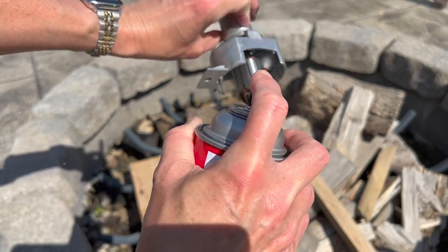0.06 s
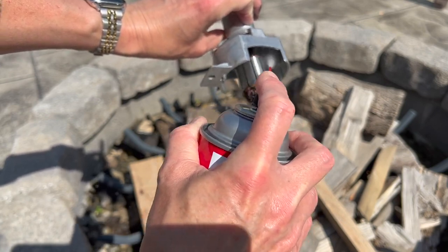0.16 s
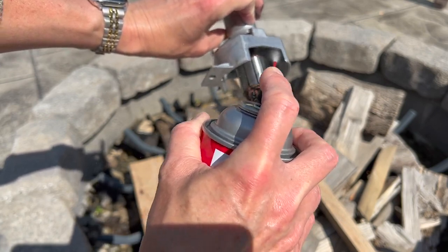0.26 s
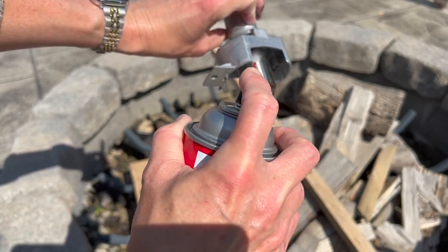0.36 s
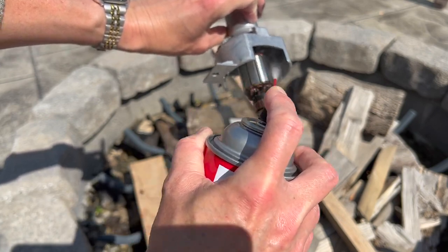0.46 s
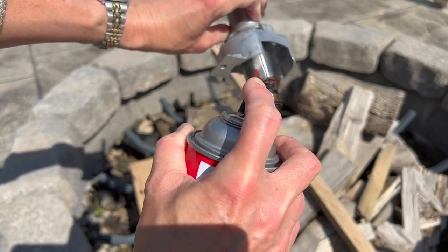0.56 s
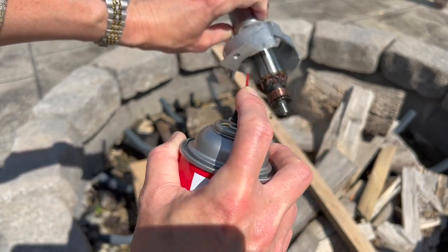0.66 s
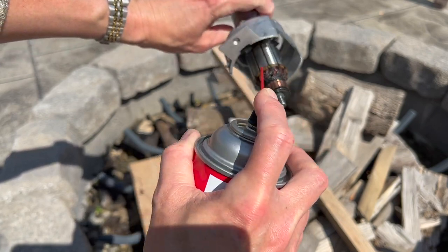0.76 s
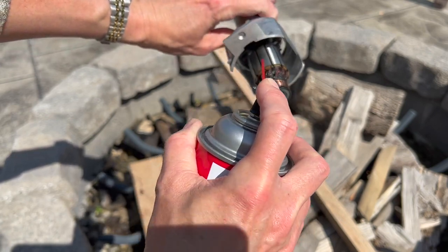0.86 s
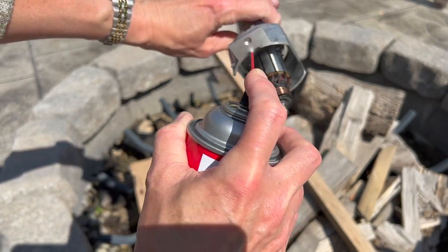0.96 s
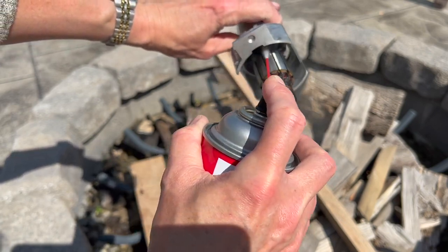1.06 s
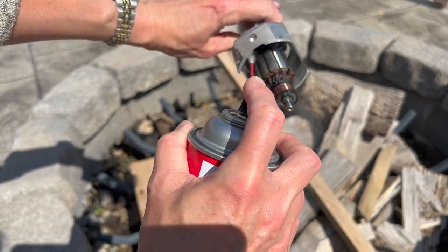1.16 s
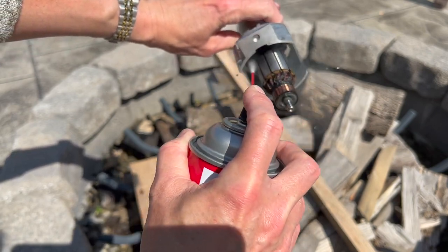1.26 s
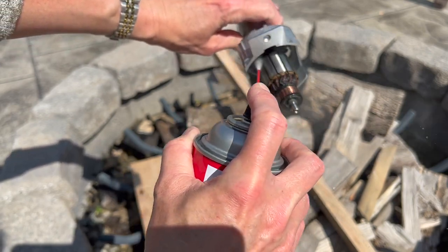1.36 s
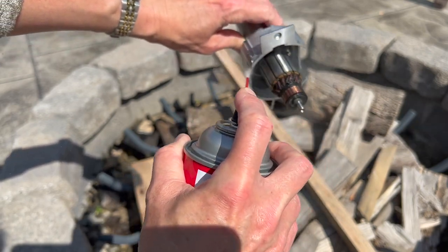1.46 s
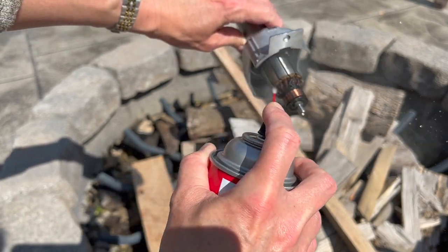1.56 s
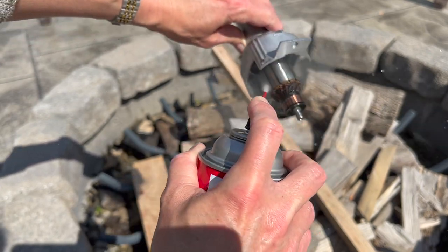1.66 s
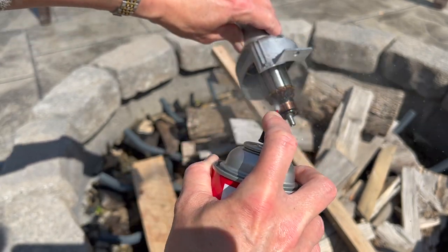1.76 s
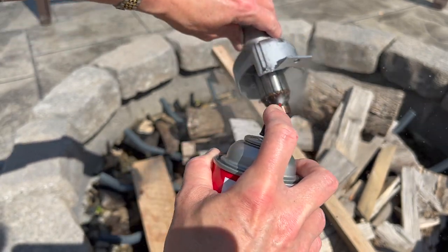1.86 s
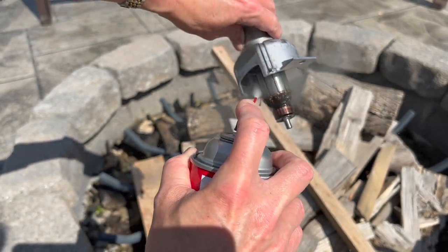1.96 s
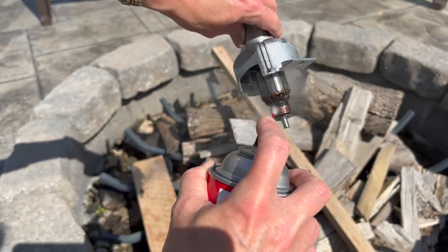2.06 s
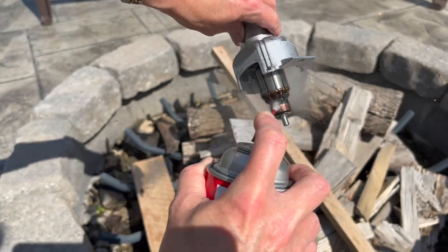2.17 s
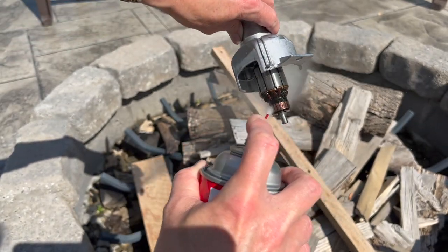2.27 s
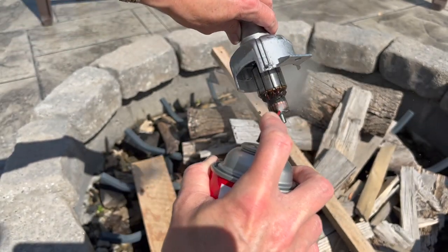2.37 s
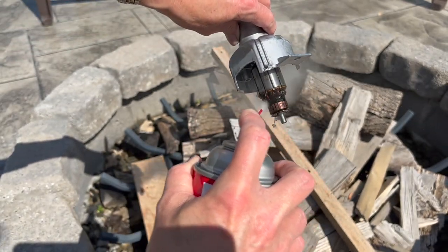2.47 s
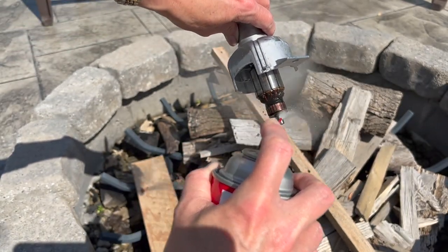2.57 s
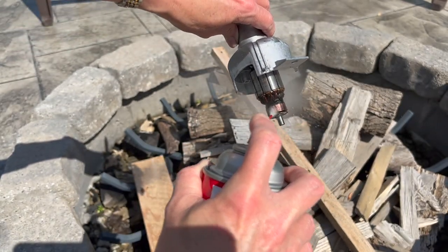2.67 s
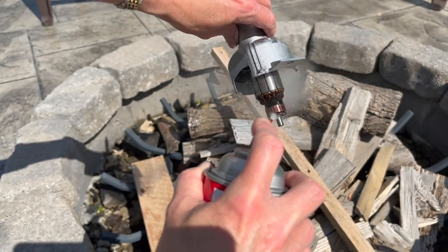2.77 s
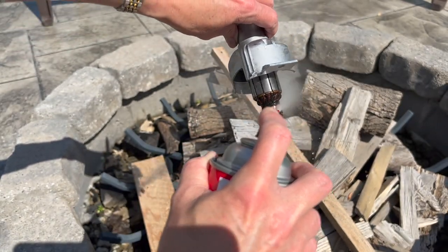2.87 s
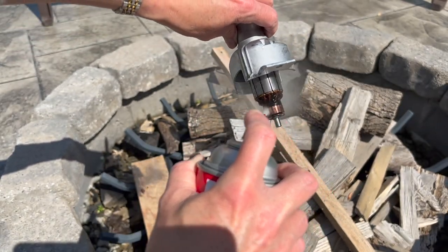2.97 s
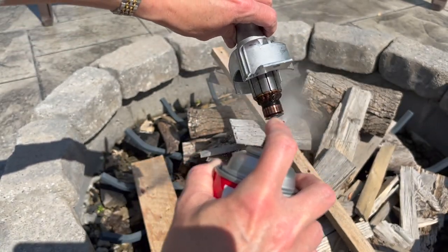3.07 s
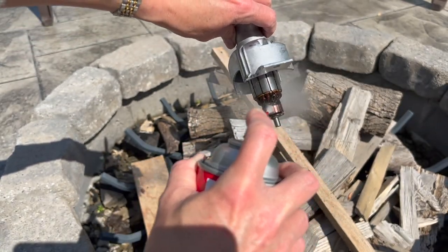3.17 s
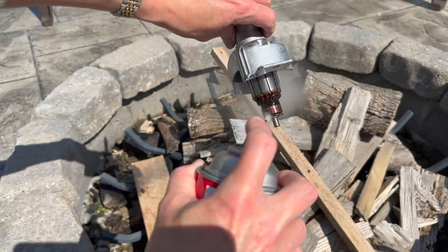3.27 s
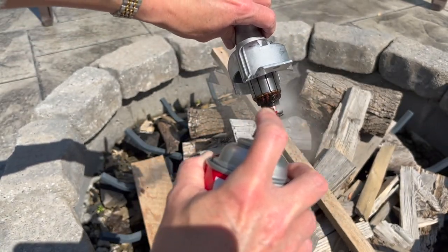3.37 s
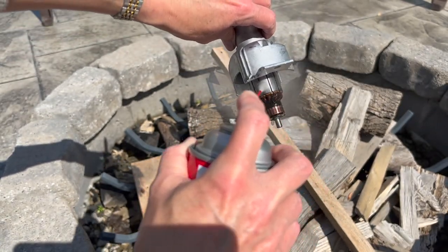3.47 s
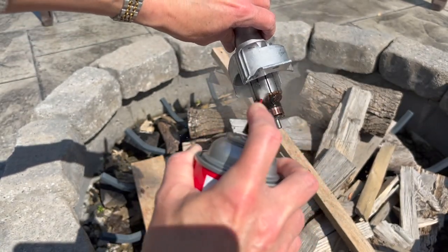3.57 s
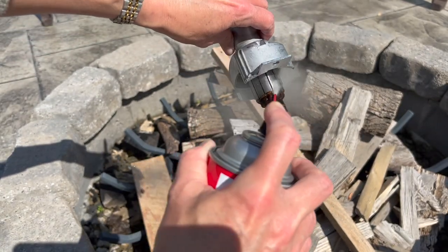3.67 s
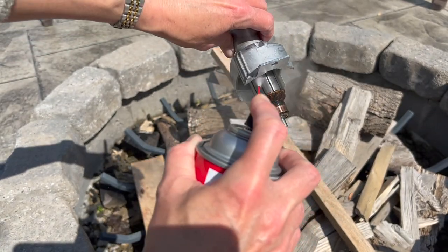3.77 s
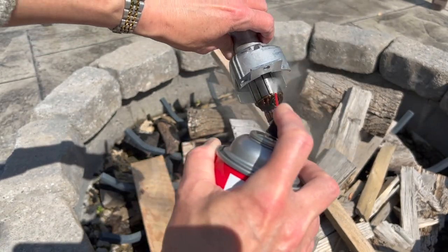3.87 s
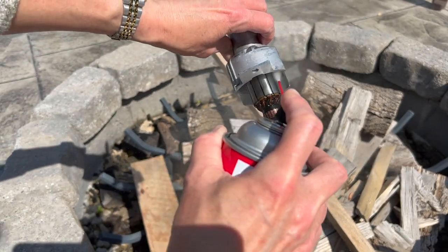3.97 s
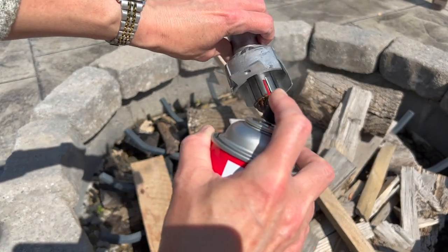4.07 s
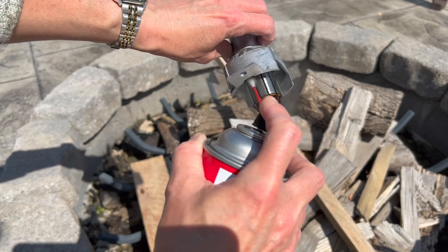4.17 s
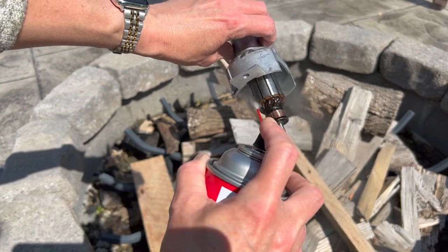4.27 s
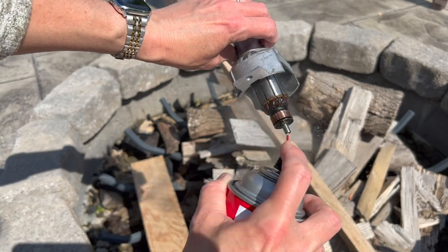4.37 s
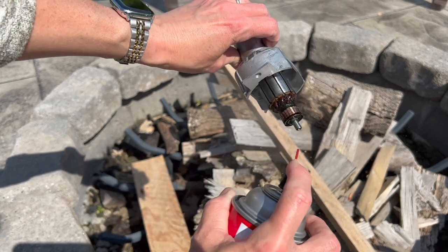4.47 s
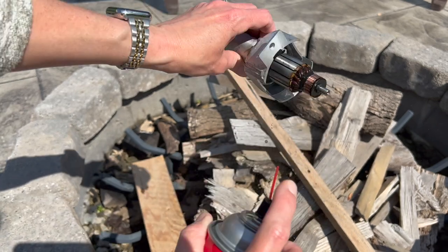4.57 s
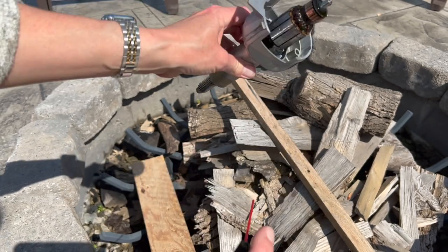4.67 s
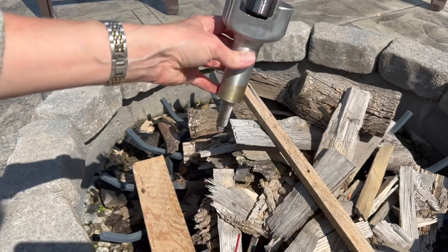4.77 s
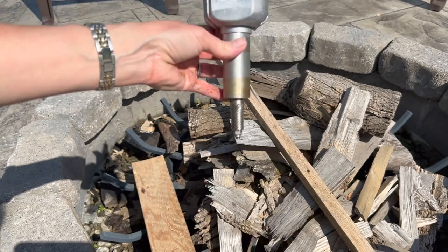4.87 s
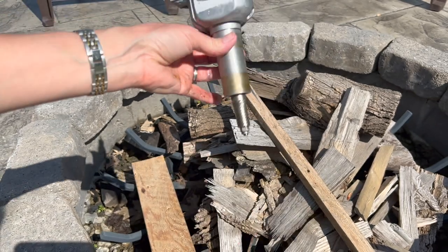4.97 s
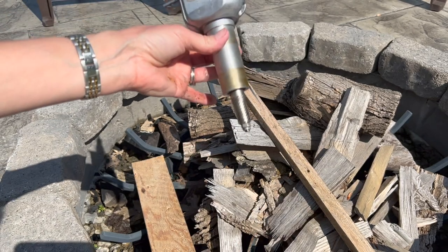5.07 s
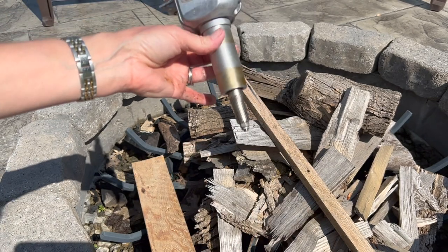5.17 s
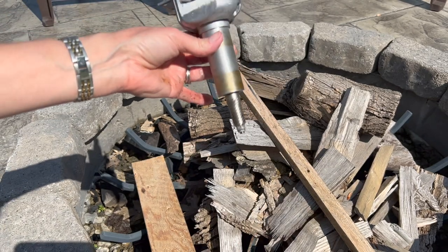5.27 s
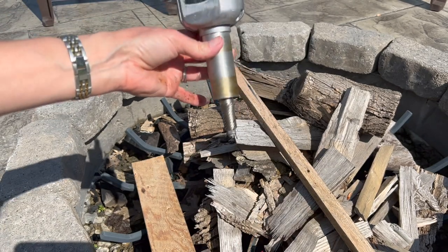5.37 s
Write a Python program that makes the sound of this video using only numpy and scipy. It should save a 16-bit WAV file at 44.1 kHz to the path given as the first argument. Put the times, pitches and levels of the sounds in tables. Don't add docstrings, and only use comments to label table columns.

```python
import sys
import numpy as np
from scipy import signal
from scipy.fft import rfft, irfft, next_fast_len
from scipy.io import wavfile
from scipy.ndimage import uniform_filter1d, minimum_filter1d, map_coordinates

SR = 44100
rng = np.random.default_rng(int(sys.argv[2]) if len(sys.argv) > 2 else 0)


def linear_from_db(decibels):
    return 10 ** (np.asarray(decibels, float) / 20)


def wrap_up_sound(samples):
    columns = np.atleast_2d(samples).T
    tamed = np.clip(columns, -1, 1)
    steps = np.round(tamed * 32767).astype(np.int16)
    wavfile.write(sys.argv[1], SR, steps)


N = 239022

# full flow in seconds, let go in seconds, closing speed in dB per second.
PRESSES = [
    (-1, 0.6877, 1201.5),
    (1.0, 4.392, 2500.5),
]
# time in seconds, level in dB.
PRESSURE = [(0, 1.5), (.6, -1), (1, 1), (1.6, -0.5), (2.1, 1), (2.6, 0.5), (3.2, -0.2), (3.6, 1.5),
            (4.4, 0.5)]
STEADY_DB = {"hiss": -30.5, "roar": -31.5, "edge": -39.5, "ring": -46.5, "note": -51}
# time in seconds, seconds to fade 10 dB, ring in dB, lowest note in dB.
INSIDE = [(0, 0.64, -26.5, -28), (.13, 0.08, -28.5, -27), (.285, -0.03, -16, -24),
          (.322, 0.0047, -9.5, -14.5), (.365, 0, -17.5, -20), (.49, 0.05, -21.5, -27.5),
          (.64, 1, -36.5, -32), (.995, 0.05, -17.5, -23), (1.035, 0.0158, -12, -16.5),
          (1.075, .04, -16, -22), (1.12, .02, -21.5, -18), (1.15, 0.06, -14.5, -26),
          (1.195, 0.0845, -9.5, -26), (1.225, 0.01, -19.5, -17), (1.27, 0.0539, -11, -15.5),
          (1.305, 0.1, -22, -25), (1.406, 0.12, -15.5, -24), (1.5, 0.06, -9.5, -15.5),
          (1.545, -0.03, -22, -18), (1.715, 0.01, -18, -23.5), (1.765, 0.06, -20.5, -33.5),
          (1.9, -0.12, -20, -33.5), (1.99, 0.1, -42, -27.5), (2.04, 0.03, -18, -29),
          (2.35, -0.3, -26.5, -50), (2.454, 0, -18, -50.5), (2.56, -0.5, -26, -48), (2.796, 0, -22, -38),
          (3.03, -0.96, -22.5, -36), (3.32, 0, -19, -36.5), (3.53, 0.7, -40, -29), (3.62, 0.17, -29, -31.5),
          (3.775, 0.02, -16, -22), (3.81, 0, -12, -26), (3.945, .03, -25, -20), (4.0, 0.05, -25, -16),
          (4.045, 0.03, -13, -19.5), (4.11, 0, -21, -31), (4.215, 0.1, -18.5, -22.5),
          (4.3, 0.04, -21.5, -29)]
# time in seconds, seconds to fade 10 dB, splash in dB, hiss in dB.
GRAZES = [(.118, 1.5, -36, -29), (.325, -0.3, -29.5, -31), (.428, 0.03, -22.5, -16.5),
          (.555, 0.03, -25, -23), (.66, 0.7, -45, -30), (1.007, 0.0232, -6.5, -15.5),
          (1.07, 0.19, -23.5, -17.5), (1.22, 0.16, -20.5, -18.5), (1.355, 0.13, -20, -20),
          (1.42, 0.03, -22.5, -17.5), (1.59, 0.0357, -16.5, -21), (1.646, 0.16, -25, -16),
          (1.806, 0, -43.5, -27), (1.9, 0.07, -24.5, -20.5), (1.966, 0.09, -29, -19), (2.04, 0, -35, -23),
          (2.228, 0.2, -46, -25.5), (2.35, 0.16, -34.5, -27.5), (2.454, 0.05, -36, -29),
          (2.57, 0.15, -34.5, -25), (2.796, 0.05, -32, -21.5), (3.022, 0.03, -47, -18.5),
          (3.332, 0.5, -39.5, -25.5), (3.54, 0.08, -19.5, -18), (3.68, 0.25, -36.5, -24.5),
          (3.755, 0.05, -24.5, -28), (3.8, 0.04, -23, -25.5), (3.85, .04, -25, -20),
          (3.895, 0.04, -27, -26.5), (4.1, 0.1, -24, -16.5), (4.18, 0.04, -21, -22),
          (4.285, 0.04, -21, -19.5), (4.37, 0.07, -32, -20.5)]
# time in seconds, boost in dB, length in seconds.
GULPS = [
    (0.999, 1, 0.0035),
    (1.027, 1.5, 0.0052),
    (1.398, 4.5, 0.0045),
    (1.453, 4.5, 0.0081),
    (1.49, 3, 0.013),
    (1.589, 4.5, 0.01),
    (1.747, 4.5, 0.0054),
    (2.558, 2.5, 0.009),
    (2.796, 2.5, 0.008),
    (3.042, 0, 0.0071),
]
# time in seconds, lowest note in Hz, aim (0 deep, 1 shallow, 2 sidelong).
TURN = [(0, 910, 0.28), (.33, 935, 0.24), (.7, 894, 0.29), (1.04, 918, 0.8), (1.28, 861, 0.98),
        (1.4, 873.6, 0.77), (1.5, 873, 0.3), (1.75, 878, 0.12), (2.05, 883, 0.53), (2.8, 897, 1.2),
        (3.4, 886, 1), (3.75, 899, 3), (4.05, 919, 1.9), (4.4, 890, 1.43)]
# time in seconds, lean in dB.
LEAN = [(0, -1.5), (.6, -6), (1, 6.5), (1.15, -0.5), (1.35, 0.5), (1.6, 1), (2, 0), (3.5, -1), (3.9, -4.5),
        (4.12, -1), (4.2, -3.5), (4.3, 0.5)]
# frequency in Hz, level in dB per Hz.
HISS = [(2500, -120), (4000, 0.5), (5000, -7.5), (5750, -3), (6500, -11.5), (7500, -7), (9000, -9),
        (10000, -7.5), (12000, 0), (15600, -2.5)]
# frequency in Hz, level in dB per Hz.
ROAR = [(100, -120), (200, -13.5), (400, -6.5), (700, -1), (950, -2), (1200, 0.5), (1400, -2.5),
        (1560, -4.5), (1850, -5), (2150, -6.5), (2500, -4.5), (2900, -6), (3500, -6), (4900, -14),
        (5700, -12.5), (9000, -36.5)]
# frequency in Hz, width in Hz, level in dB.
EDGE = [(6700, 1400, 2.5), (7970, 3100, 2)]
# frequency in Hz, width in Hz, level in dB.
HOUSING = [
    [(1825, 420, -1), (2100, 220, -3.5), (2606, 300, -3.5), (2900, 300, -3.5), (3700, 300, -7.5)],
    [(2060, 260, -2.5), (2437, 380, 0), (3050, 470, -4), (3910, 790, -2.5), (5200, 590, -6.5)],
    [(1950, 400, -2), (2625, 220, 0.5), (2900, 320, -2), (3450, 296, -8), (4970, 450, -9.5)],
]
# frequency in Hz, gain in dB.
PIT_COMB = [(3950, 0), (4400, -4), (4850, 1), (5200, 0), (5650, -8.5), (6150, 0)]

# time in seconds, peak in dB, frequency in
# Hz, 60 dB decay in seconds, width share.
TICKS = [(0.805, -45, 2010, .03, .5), (.8624, -44, 2340, 0.018, 0.43), (.8894, -49, 4170, .015, .9),
         (.9128, -39, 2900, 0.018, 0.68), (4.492, -37, 2500, 0.012, 0.21), (4.492, -37, 3700, 0.015, 0.26),
         (4.4917, -51, 8150, .008, .4), (4.5984, -37.5, 5400, 0.099, 0.6), (4.5984, -47, 2400, .02, .4),
         (4.722, -46, 6200, .03, 0.53), (5.295, -48, 5200, .04, .4), (4.5984, -45, 12000, .02, .3),
         (4.6944, -56, 14140, 0.0087, 0.32), (4.7744, -48, 14000, .012, 0.28),
         (5.335, -52.5, 14800, 0.4, .2)]
# time in seconds, frequency in Hz, level in dB, 60 dB decay in seconds.
DRIBBLE = [
    (.7, 2130, -61, 1.6),
    (.7, 12050, -57, .5),
    (4.4, 2130, -64, 1.0),
]

# time in seconds, pitch ratio, level in dB, kind of call.
CALLS = [
    (2.658, 1.0, -24.5, "short"),
    (4.727, 1.0, -30.5, "call"),
    (5.303, 1.0, -32, "reply"),
]
# seconds after start, length in seconds, from Hz, to Hz, level in dB.
FULL_CALL = [(-.026, .03, 7400, 6000, -23), (-.014, .012, 3800, 4200, -18), (0, .021, 3700, 4400, -6),
             (.003, .024, 4650, 4800, -6), (.022, .026, 4100, 3200, -3), (.036, .018, 4250, 4250, -8),
             (.05, .021, 2980, 3060, 0), (.071, .014, 3100, 3900, -7), (.03, .025, 7300, 7700, -27),
             (.07, .04, 7600, 6500, -28), (.072, .03, 4700, 4700, -19), (.083, .013, 3300, 2900, -5),
             (.098, .01, 2950, 2350, -1), (.109, .016, 2500, 2550, -19)]
# seconds after start, length in seconds, from Hz, to Hz, level in dB.
CLIPPED_CALL = [(0, .025, 4200, 3400, 0), (.022, .012, 3950, 4150, -4), (.04, .014, 3200, 3150, 0),
                (.053, .013, 3200, 3750, -4)]
# seconds after start, length in seconds, from Hz, to Hz, level in dB.
REPLY = [(-.028, .016, 6500, 7100, -26), (-.018, .016, 6700, 6450, -20), (-.022, .024, 4200, 3850, -14),
         (-.003, .01, 2500, 3500, -19), (.003, .015, 3500, 4700, -8), (.016, .01, 4650, 4700, -10),
         (.008, .018, 3600, 3900, -13), (.023, .022, 4150, 3250, -4), (.035, .008, 3500, 4200, -9),
         (.041, .014, 4200, 3900, -6), (.051, .014, 2900, 3100, 0), (.063, .018, 3100, 4000, -4),
         (.079, .017, 3250, 3200, -4), (.094, .008, 2700, 2350, -1), (.101, .008, 2700, 3400, -10),
         (.105, .012, 2500, 2450, -10)]
# delay in seconds, level in dB.
SLAPS = [(.006, -14), (.014, -17), (.03, -15), (.055, -18)]
# frequency in Hz, 60 dB decay in seconds.
YARD_DECAY = [(1000, .9), (3500, 1.2), (8000, .6)]

# time in seconds, level in dB.
BUFFET = [(0, -43), (.69, -45.5), (.92, -48.5), (1.1, -44.5), (1.35, -38.5), (1.7, -47), (3, -44),
          (3.86, -43.5), (4.05, -47.5), (4.5, -45), (5.42, -44.5)]
# time in seconds, peak in dB, pitch in Hz, length in seconds, membrane flap in dB.
PUFFS = [(1.084, -29, 52, 0.014, -36), (1.124, -23, 105, 0.009, -27), (1.149, -13.5, 71.7, 0.011, -30),
         (1.274, -19.5, 71, 0.01, -36), (1.176, -27.5, 55, .013, -36), (1.308, -31, 50.1, .012, -40),
         (1.33, -27, 104.7, 0.009, -33), (1.483, -35.5, 51.5, 0.012, -41), (3.041, -30.5, 64.6, 0.012, -29),
         (3.09, -21.5, 69, 0.0095, -34.5), (4.935, -39, 48, 0.012, -44.5)]
# frequency in Hz, level in dB per Hz.
RUMBLE = [(15, -57), (25, -21), (40, -12), (62, -2.5), (100, -6), (140, -10), (200, -20), (400, -64.5)]
# frequency in Hz, level in dB per Hz.
TRAFFIC = [(80, -120), (130, -3.5), (250, -2.5), (380, -4), (500, -8), (750, -13), (1050, -15.5),
           (1800, -26), (3000, -30.5), (5000, -44.5), (9000, -71.5)]
# frequency in Hz, level in dB per Hz.
LEAVES = [(1500, -39), (3000, 0.5), (4700, -1.5), (5400, -9), (6300, -3), (7000, -2.5), (10000, -6.5),
          (13000, -7), (15700, -11.5)]
# time in seconds, traffic in dB, leaves in dB.
YARD_DB = [(0, -42, -72), (.7, -42, -63.5), (.95, -43, -71.5), (4.4, -44, -68), (4.56, -45.5, -70),
           (4.68, -46.5, -67), (4.77, -45.5, -60), (4.88, -45.5, -69), (5.03, -44.5, -61), (5.22, -46, -68),
           (5.33, -45.5, -63), (5.42, -45.5, -68)]

# frequency in Hz, phase in radians.
PORT_LEAD = [(60, -.55), (400, .1), (700, -.4), (1100, .7), (1800, -.6), (2500, .3), (4500, 1.2), (5300, 0),
             (5800, -2.2), (6300, .9), (7550, 0), (8600, -1.4), (9950, -3.14), (11650, -4.8),
             (13600, -6.28), (15000, -7.8), (16000, -8.6)]
# frequency in Hz, difference in dB.
PORT_TILT = [(60, .4), (200, 0), (380, 1.5), (700, -2), (900, -3.5), (1290, 2), (2380, -.5), (4400, 1.5),
             (6500, 0), (15000, 0)]
# frequency in Hz, likeness from 0 to 1.
JET_ALIKE = [(60, .95), (600, .9), (1400, .86), (2300, .96), (3400, .85), (4400, .65), (5800, .35),
             (6500, .9), (8000, .95), (16000, .93)]
# frequency in Hz, threshold in dB.
STEREO_MASK = [(1200, -30), (2300, -14), (4500, -11), (7000, -6.5), (9500, -4), (11500, -4.5), (14500, -7),
               (16000, -7)]


def unit(x):
    return x / np.sqrt(np.mean(x ** 2) + 1e-20)


def along(points, hz):
    f, v = np.transpose(points)
    return np.interp(np.log(hz + 1), np.log(f + 1), v)


def curves(rows):
    s, *cols = np.transpose(rows)
    return [np.interp(np.arange(N) / SR, s, c) for c in cols]


def wobble(rate):
    knots = rng.standard_normal(int(N * rate / SR) + 4)
    return map_coordinates(knots, [np.arange(N) * rate / SR])


def filtered(x, response):
    m = next_fast_len(N + SR // 2)
    return irfft(rfft(x, m) * response(np.fft.rfftfreq(m, 1 / SR)), m)[..., :N]


def coloured(spectrum):
    return lambda hz: linear_from_db(along(spectrum, hz))


def resonant(modes):
    def gain(f):
        power = 0
        for centre, width, db in modes:
            damping = (f * width) ** 2
            peak = damping / ((centre * centre - f * f) ** 2 + damping)
            power = power + linear_from_db(2 * db) * peak ** 2
        return np.sqrt(power)
    return gain


def ports(x):
    def half(hz):
        return linear_from_db(along(PORT_TILT, hz) / 2) * np.exp(.5j * along(PORT_LEAD, hz))
    return filtered(x, lambda hz: np.array([half(hz), 1 / half(hz)]))


def rush(gain, patchy_db, alike=JET_ALIKE, flutter_db=0):
    z = signal.stft(rng.standard_normal((2, N)) * linear_from_db(flutter_db), nperseg=512)[2]
    patches = uniform_filter1d(rng.standard_normal(z.shape[1:]), size=7, axis=0)
    patches = uniform_filter1d(patches, size=8, axis=1)
    pair = signal.istft(z * linear_from_db(patchy_db * unit(patches)), nperseg=512)[1][:, :N]

    def spread(hz):
        angle = np.arccos(np.clip(along(alike, hz), -1, 1)) / 2
        return gain(hz) * [np.cos(angle), np.sin(angle)]
    common, apart = filtered(pair, spread)
    return unit(ports(np.array([common + apart, common - apart])))


def flow(t):
    presses = []
    for full, off, close_db_per_s in PRESSES:
        opening = 229 * np.clip(full - t, 0, None)
        cracking = 1199 * np.clip(full - 0.055 - t, 0, None)
        easing = 6 * np.clip(1 - (off - t) / 0.04, 0, 1)
        closing = close_db_per_s * np.clip(t - off, 0, None)
        presses.append(-opening - cracking - easing - closing)
    return np.max(presses, axis=0), np.interp(t, *np.transpose(PRESSURE))


def sweeps(rows, column, steady_db, lags=1):
    t = np.arange(0, N, 96) / SR
    open_db, pressure_db = flow(t)
    power = linear_from_db(2 * (steady_db + pressure_db))
    for row in rows:
        away = abs(t - row[0]) * np.sign((t - row[0]) * 0 + 1)
        away = (t - row[0]) / max(row[1], .005)
        power = power + linear_from_db(2 * row[column] - 20 * abs(away))
    return np.interp(np.arange(N) / SR, t, 10 * np.log10(power) + lags * open_db)


def gulp_boost():
    t, boost = np.arange(N) / SR, 0
    for s, boost_db, span in GULPS:
        u = np.clip((t - s + 0.0017) / span, 0, 50)
        boost = boost + boost_db * u * np.exp(1 - u)
    return boost


def edge_splash(spit):
    splash = rush(resonant(EDGE), patchy_db=4.5, flutter_db=spit)
    lean_db, = curves(LEAN)
    lower = filtered(splash, lambda hz: hz < 7200)
    return linear_from_db(lean_db) * lower + linear_from_db(-lean_db) * (splash - lower)


def housing_ring(spit):
    aim = np.clip(curves(TURN)[1], 0, 2)
    swirl = rush(np.ones_like, patchy_db=3.0, flutter_db=spit)
    ring = 0
    for k, modes in enumerate(HOUSING):
        ring = ring + np.clip(1 - abs(aim - k), 0, 1) * unit(filtered(swirl, resonant(modes)))
    return ring


def spray():
    treble_lags = 1.18
    hiss_db = sweeps(GRAZES, column=3, steady_db=STEADY_DB["hiss"], lags=treble_lags)
    edge_db = sweeps(GRAZES, column=2, steady_db=STEADY_DB["edge"], lags=treble_lags)
    ring_db = sweeps(INSIDE, column=2, steady_db=STEADY_DB["ring"])
    inside = np.clip((ring_db + 25.5) / 12, 0, 1)
    on_edge = np.clip((edge_db + 25.5) / 12, 0, 1)
    roar_db = sweeps([], column=0, steady_db=STEADY_DB["roar"])
    roar_db = roar_db + 5.5 * inside - 4.5 * on_edge
    gulps = gulp_boost()
    spit = 0.59 * wobble(250) + 1.27 * wobble(40)
    jet = linear_from_db(hiss_db + 1.5 + gulps) * rush(coloured(HISS), patchy_db=.7, flutter_db=spit)
    jet += linear_from_db(roar_db + 7.0 + gulps) * rush(coloured(ROAR), patchy_db=1.23, flutter_db=.7 * spit)
    jet += linear_from_db(edge_db - 1.0 + 0.51 * gulps) * edge_splash(spit)
    return jet + linear_from_db(ring_db - 3.0 + 1.34 * gulps) * housing_ring(spit)


def hollow():
    level_db = sweeps(INSIDE, column=3, steady_db=STEADY_DB["note"])
    level_db = level_db - 1.8 * np.clip(-26.5 - level_db, 0, 40)
    hz = curves(TURN)[0] + 7 * wobble(15)
    breathy = (wobble(130) + 1j * wobble(130)) * linear_from_db(1.9 * wobble(40))
    note = unit((breathy * np.exp(2j * np.pi * np.cumsum(hz) / SR)).real)
    return linear_from_db(level_db - 1.5) * ports(np.array([note, note])) * linear_from_db([[-1.5], [1.5]])


def pit(x):
    t = np.arange(SR // 4) / SR
    tail = rng.standard_normal((2, len(t))) * linear_from_db(-60 * t / .16)
    return linear_from_db(-23.5) * signal.fftconvolve(x[None], tail / np.linalg.norm(tail[0]), axes=1)[:, :N]


def valve():
    out, t, short = np.zeros(N + SR), np.arange(N) / SR, np.arange(SR // 4) / SR
    for s, db, hz, t60, share in TICKS:
        burst = rng.standard_normal(len(short)) * np.clip(short / 0.0012, 0, 1) * linear_from_db(-60 * short / t60)
        ring = signal.iirpeak(hz, 1 / share, SR)
        burst = signal.lfilter(*ring, signal.lfilter(*ring, burst))
        out[round(s * SR):][:len(short)] += linear_from_db(db) * burst / abs(burst).max()
    out = out[:N]
    for s, hz, db, t60 in DRIBBLE:
        whistle = unit(filtered(rng.standard_normal(N), resonant([(hz, 130, 0)])))
        out += linear_from_db(db - 60 * abs(t - s) / t60) * (t > s) * whistle
    return ports(np.array([out, out]))


def bird():
    out = np.zeros(N + SR)
    quaver, hoarse = wobble(900), wobble(400)
    kinds = {"call": FULL_CALL, "short": CLIPPED_CALL, "reply": REPLY}
    for start, ratio, call_db, kind in CALLS:
        for after, span, from_hz, to_hz, db in kinds[kind]:
            u = np.linspace(0, 1, round(span * SR))
            at = np.minimum(round((start + after) * SR) + np.arange(len(u)), N - 1)
            glide = from_hz + (to_hz - from_hz) * (1 - np.cos(np.pi * u)) / 2
            shake = .013 + .04 * (from_hz > 6000)
            phase = 2 * np.pi * np.cumsum(ratio * glide * (1 + shake * quaver[at])) / SR
            tone = np.sin(phase) + linear_from_db(-30.5) * quaver[at] * np.sin(2 * phase)
            level = linear_from_db(call_db + db + rng.normal(0, 1) + 2.6 * hoarse[at])
            out[at[0]:][:len(u)] += level * np.sin(np.pi * u) ** 0.47 * tone
    return out[:N]


def echo(x):
    hz, t, z = signal.stft(rng.standard_normal((2, SR)), SR, nperseg=256)
    tail = signal.istft(z * linear_from_db(-60 * t / along(YARD_DECAY, hz)[:, None]), SR, nperseg=256)[1]
    late = np.pad(x, (500, 0))[None]
    return signal.fftconvolve(late, tail / np.linalg.norm(tail[0]), axes=1)[:, :N]


def bird_in_yard():
    def delayed(x, seconds):
        return np.pad(x, (round(seconds * SR), 0))[:N]
    call = bird()
    scattered = call * wobble(320)
    near = call + sum(linear_from_db(db) * delayed(scattered, s) for s, db in SLAPS)
    far_wall = resonant([(3100, 500, 4), (4600, 500, -6)])
    near += linear_from_db(-14) * filtered(delayed(.4 * call + scattered, .084), far_wall)
    tail_colour = resonant([(2500, 500, -10), (3200, 500, -4), (4000, 1180, 2.5), (7300, 1800, 2.5)])
    tail = filtered(echo(call * wobble(800)), tail_colour)
    return ports(np.array([near, near])) + linear_from_db(-7.0) * tail


def wind():
    buffet_db, = curves(BUFFET)
    t = np.arange(N) / SR
    flap = unit(filtered(rng.standard_normal(N), resonant([(141, 67, 0)])))
    puffs = 0
    for s, db, hz, span, flap_db in PUFFS:
        u = np.clip((t - s) / span, -4, 4)
        swell = np.exp(-((u - 0.68) / np.where(u > .68, 1.25, .9)) ** 2)
        thump = np.sin(2 * np.pi * hz * span * u * (1 - 0.057 * (u - 1)))
        puffs = puffs + swell * (linear_from_db(db + 5.5) * thump + linear_from_db(flap_db + 1.0) * flap)
    rumble = linear_from_db(buffet_db + 3.0 + 1.7 * wobble(16)) * rush(coloured(RUMBLE), patchy_db=1.0)
    return rumble + ports(np.array([puffs, puffs]))


def yard():
    traffic_db, leaves_db = curves(YARD_DB)
    traffic = rush(coloured(TRAFFIC), patchy_db=1.5, alike=[(100, 1.0), (1000, 0.2)])
    leaves = rush(coloured(LEAVES), patchy_db=3.5, alike=[(3000, .7), (9000, 0.51)])
    return linear_from_db(traffic_db) * traffic + linear_from_db(leaves_db) * leaves


def scene():
    jet = filtered(spray(), coloured(PIT_COMB)) + hollow()
    answers = linear_from_db(-35.0) * echo(jet[0]) + pit(jet[0])
    return jet + answers + valve() + bird_in_yard() + wind() + yard()


def thinned_stereo(x):
    lead_in = 1024 - 782
    pair = np.pad([x[0] + x[1], x[0] - x[1]], ((0, 0), (lead_in, 0))) / 2
    hz, _, z = signal.stft(pair, SR, nperseg=2048)
    edges = np.r_[0, np.geomspace(40, 320, 17).astype(int), 336:1024:8]
    power = np.add.reduceat(abs(z) ** 2, edges, axis=1)
    power = uniform_filter1d(power, size=2, axis=2) + 1e-20
    mood = uniform_filter1d(rng.standard_normal(power.shape), size=4, axis=2)
    slow = uniform_filter1d(rng.standard_normal(power.shape), size=5, axis=1)
    mood = mood + 5.5 * uniform_filter1d(slow, size=6, axis=2)
    threshold_db = along(STEREO_MASK, hz[edges])[:, None] + 2.4 * mood
    keep = power > power[::-1] * linear_from_db(2 * threshold_db)
    band = np.searchsorted(edges, np.arange(len(hz)), "right") - 1
    z = z * keep[:, band] * (hz < 15920)[:, None]
    middle, side = signal.istft(z, SR, nperseg=2048)[1][:, lead_in:][:, :N]
    return np.array([middle + side, middle - side])


def limited(x):
    span = round(.004 * SR)
    need = np.minimum(1, .97 / (abs(x).max(axis=0) + 1e-9))
    return x * uniform_filter1d(minimum_filter1d(need, size=span), size=span)


def band_limit(x):
    return signal.sosfilt(signal.butter(12, 16320, fs=SR, output="sos"), x)


def record(dry):
    mix = np.clip(limited(thinned_stereo(dry)), -1, 1)
    return band_limit(mix)


dry = scene()
out = record(dry)
wrap_up_sound(out)
```